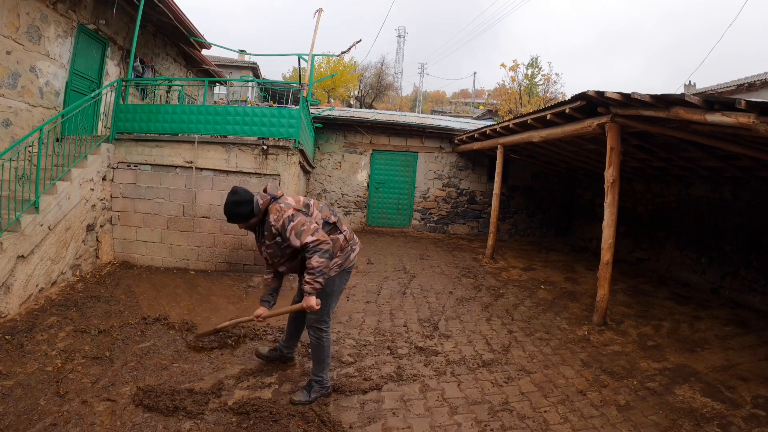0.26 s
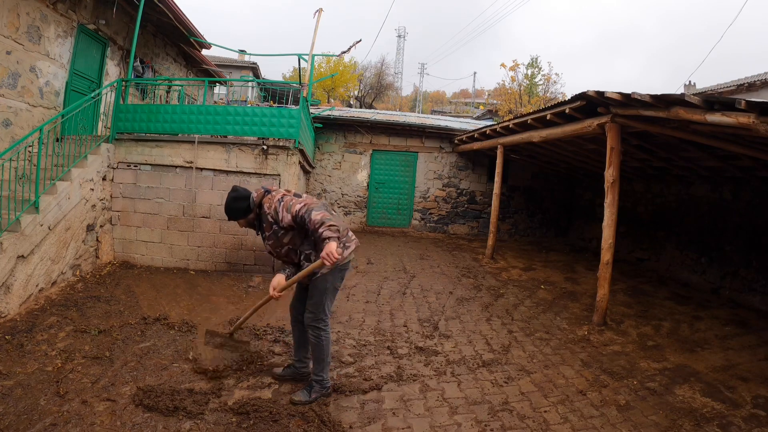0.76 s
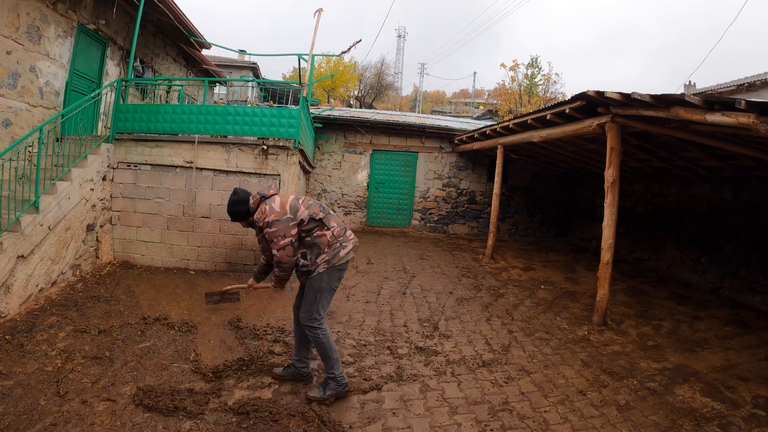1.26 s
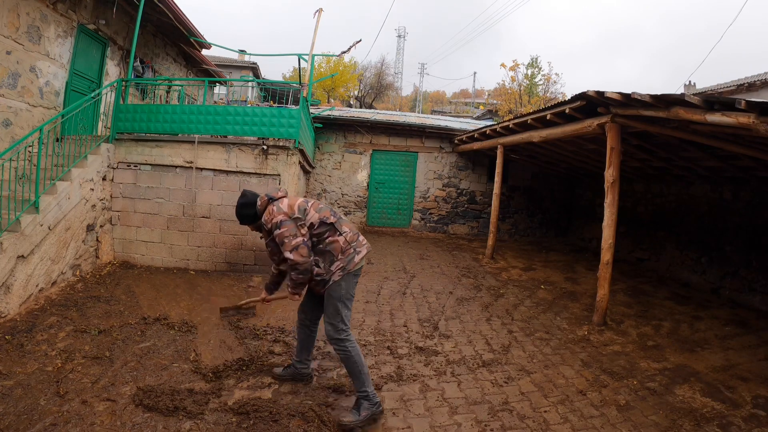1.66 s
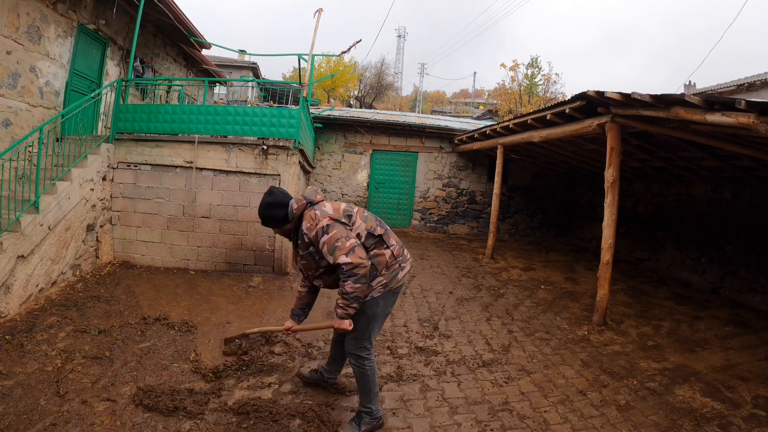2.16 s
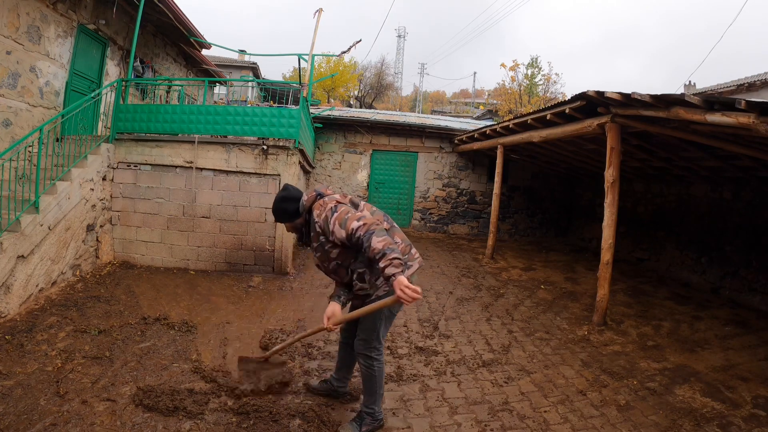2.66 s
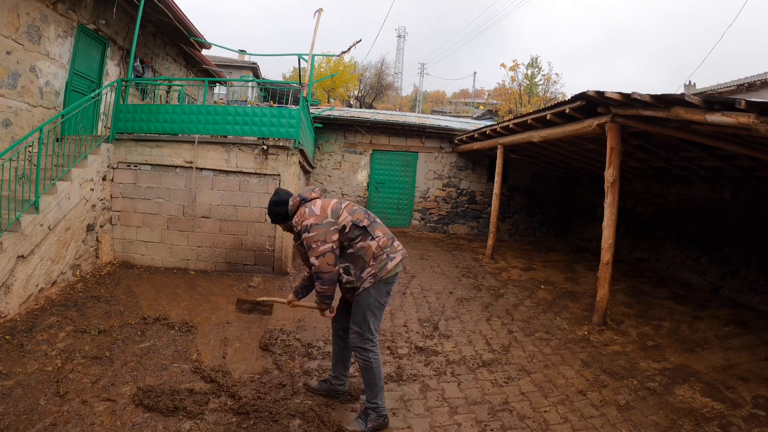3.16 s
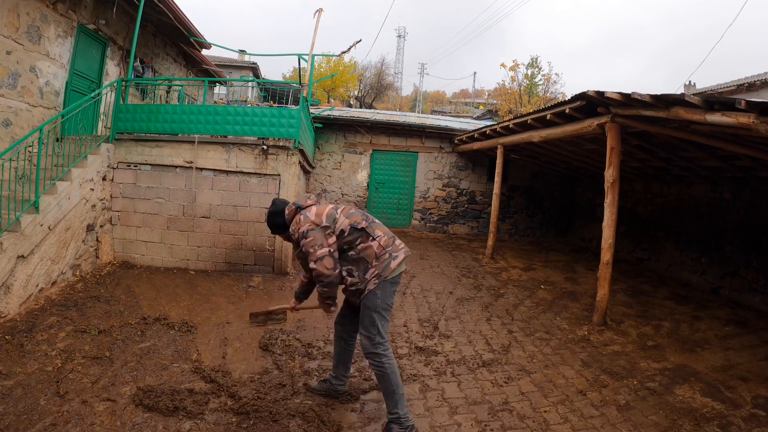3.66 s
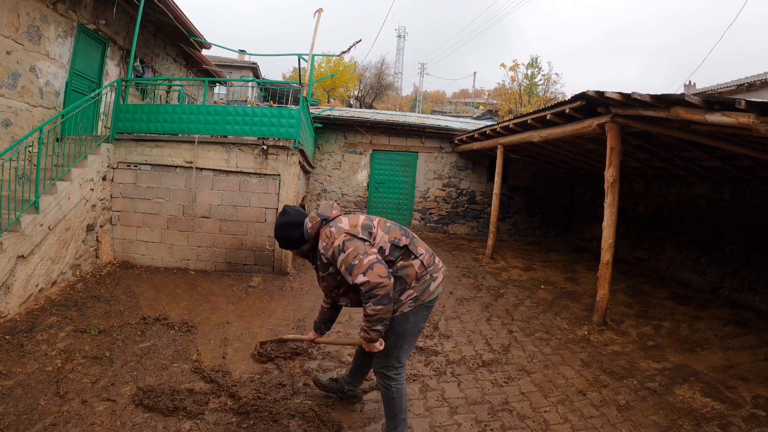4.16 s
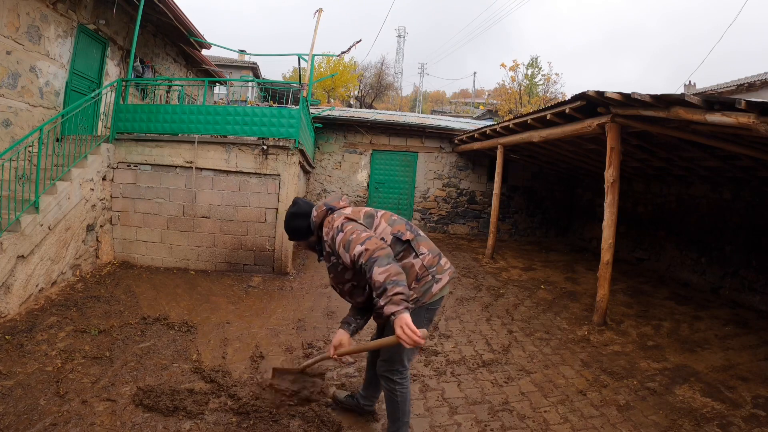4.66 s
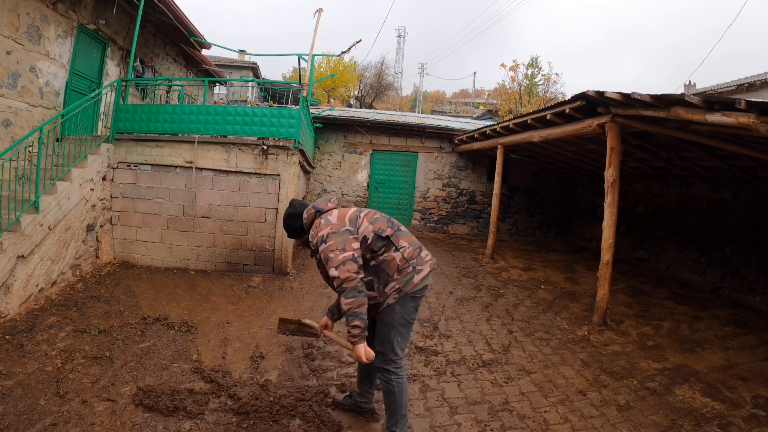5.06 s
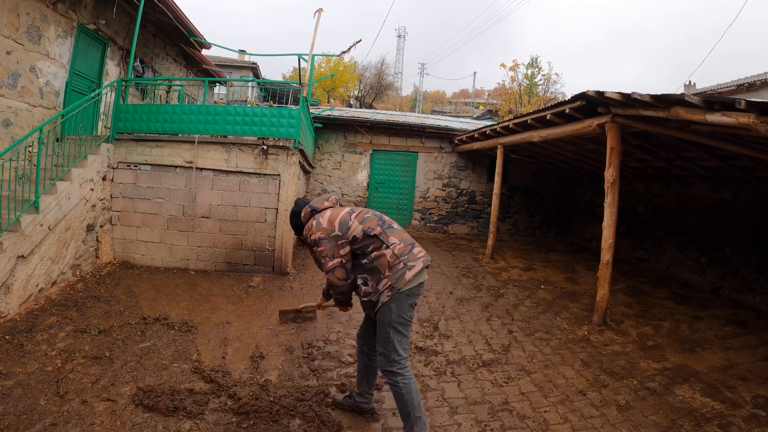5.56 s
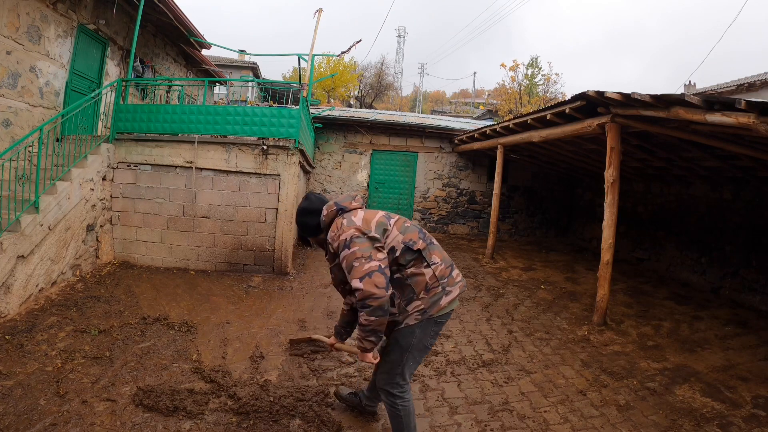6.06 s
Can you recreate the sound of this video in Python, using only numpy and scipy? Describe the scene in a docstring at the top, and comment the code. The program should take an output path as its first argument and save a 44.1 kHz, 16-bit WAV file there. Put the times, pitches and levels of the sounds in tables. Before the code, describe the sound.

A steel shovel pushes through wet mud on stone paving in a walled yard, a few metres away. Four gritty, rasping strokes come one after another, each full of sharp clacks and dull thuds as the edge catches on joints and the blade briefly rings. In the pauses mud drops off in small wet spatters, a jacket swishes and boots shift softly. The outdoor air behind is faint.

```python
"""Shovelling mud off stone

A steel shovel is pushed through wet mud over paving in a walled yard, a few metres away.
The edge rasps on grit and knocks on the joints between stones, ringing the blade and shaking the ground.
Between strokes mud drops off, a jacket swishes and boots shift, over faint outdoor air.
The walls answer, and the loudest knocks overload."""
import sys
import numpy as np
from scipy import signal
from scipy.fft import rfft, irfft, next_fast_len
from scipy.io import wavfile
from scipy.ndimage import uniform_filter1d, map_coordinates

SR = 44100
rng = np.random.default_rng(int(sys.argv[2]) if len(sys.argv) > 2 else 0)


def wav_out(sig):
    """Save sig, one row per channel (or a flat mono array), as 16-bit PCM at SR to the path in sys.argv[1]."""
    wavfile.write(sys.argv[1], SR, np.round(np.clip(np.atleast_2d(sig).T, -1, 1) * 32767).astype(np.int16))


N = 277830

# Tone colours: freq_hz, level_db
AIR_EQ = [(20, -95), (45, -87), (70, -113.5), (110, -100), (250, -79), (600, -101), (1300, -91.5),
          (4000, -92.5), (16000, -98)]
SLEEVE_EQ = [(300, -33), (1200, 3), (3000, 0), (5500, -1), (7000, -5), (16000, -5.5)]
BOOT_EQ = [(40, -33.5), (110, -11), (250, 3.5), (600, -10.5), (1200, -4), (2500, -14.5), (8000, -58)]
GROUND_EQ = [(12, -42.5), (22, -19.5), (50, -9.5), (80, 0), (115, -6), (200, -14.5), (700, -64)]
RUMBLE_EQ = [(40, -50.5), (90, -25), (130, -5.5), (170, 2), (330, -9), (600, -13), (2000, -100.5)]
GRIT_EQ = [(500, -31), (1800, 10), (3000, 1.5), (4500, -4.5), (7000, -11.5), (16000, -29.5)]
RASP_EQ = [(60, -79.5), (250, -14.5), (500, 3), (1000, 7), (1600, 0), (2500, -13.5), (5000, -45.5),
           (16000, -28.5)]
REVERB_EQ = [(45, -16), (100, -3), (1000, -2.5), (4000, -1.5), (10000, 1.5)]
MIC_EQ = [(20, -11), (6500, 1.5), (7500, -2), (8400, -12.5), (12500, -13), (14500, -32), (16000, -24)]
# Width of diffuse sound: freq_hz, left_right_correlation
STEREO_LIKENESS = [(60, 0.803), (500, 0.927), (2000, 0.365), (5000, 0.12), (10000, 0.15)]
# Stereo balance: freq_hz, left_over_right_db
BALANCE = [(60, 1), (180, -0.5), (520, 1), (1500, 3), (2600, 2.5), (4500, 1), (7500, 0.5), (12000, -2)]
# Decay of the yard: freq_hz, t60_s
WALL_DECAY = [(100, .24), (300, .36), (1000, .27), (3000, .24), (8000, .33)]
# Body movements: peak_s, level_db, rise_s, fall_s (both per 20 dB, sign ignored)
SLEEVE_MOVES = [(.72, -46, 0.091, 0.4), (.9, -55, .2, 1.07), (1.11, -55.5, 0.052, -1.5),
                (1.2, -47, 0.044, -0.64), (1.27, -42.5, 0.12, 0.21), (2.57, -39.5, 0.146, 0.1947),
                (2.67, -36, 0.03, -0.0076), (2.77, -44.5, 0.069, 0.02), (2.975, -47, .12, .15),
                (3.035, -48, .1, .07), (3.175, -50, .07, .3), (3.3, -43.5, 0.3, 0.3),
                (3.36, -45, 0.065, -0.08), (4.746, -35.5, 0.055, 0.0389), (5.31, -48, 0.037, -1.3),
                (5.39, -41, 0.28, -0.3)]
BOOT_MOVES = [(.72, -43.5, 0.057, 0.5953), (1.18, -46.5, 0.17, 0.3), (1.3, -46.5, 0.062, 2.4),
              (2.66, -40, 0.63, 0.14), (2.77, -54.5, 0.1009, 0.52), (3.04, -52, 0.057, 3.87),
              (3.19, -56.5, 0.033, 8.5), (3.3, -44, 0.16, 0.5), (4.7, -42.5, 0.37, 0.2042),
              (5.22, -56, 0.043, 0.23), (5.42, -43, 0.282, 0.4)]
# Falling mud and grit: start_s, level_db, pitch_hz, spatter_s
MUD_DROPS = [(.97, -36, 1290, 0.017), (1.079, -24.5, 1110, 0.0043), (1.112, -27.5, 1200, 0.011),
             (2.563, -6.5, 5860, 0.00345), (2.648, -15.5, 760, 0.01216), (2.665, -12, 1960, .013),
             (2.739, -18.5, 1141, 0.00874), (2.74, -28, 328.6, .005), (2.761, -17, 2875, 0.021),
             (2.769, -21, 806, 0.027), (2.81, -21, 6250, 0.0033), (2.968, -21.5, 3270, .02),
             (3.009, -24.5, 1150, 0.021), (3.022, -22.5, 1222, 0.0218), (3.034, -17, 2450, 0.0098),
             (3.047, -21.5, 1130, 0.014), (3.07, -24, 977, .025), (3.148, -32, 2500, .01),
             (3.178, -20, 1249, 0.0091), (3.18, -24.5, 329, 0.0049), (3.221, -24.5, 900, 0.011),
             (4.68, -27, 1086, 0.011), (4.729, -21.5, 898, 0.00951), (4.73, -11, 195.9, 0.00579),
             (4.746, -14, 1650, 0.011), (5.062, -35.5, 1110, 0.00536), (5.087, -29.5, 6140, .004),
             (5.216, -28, 1101, 0.00413), (5.265, -27.5, 295, 0.00522), (5.438, -12.5, 1210, 0.00423)]
# Heavy blows into the ground: start_s, peak_db
GROUND_JOLTS = [(0.001, -17.5), (0.091, -30.5), (0.226, -31.5), (0.341, -40), (0.61, -53), (1.431, -37.5),
                (1.689, -36), (1.752, -24), (2.049, -39.5), (2.309, -43), (3.349, -46.5), (3.649, -43),
                (3.73, -16), (3.838, -17), (4.209, -40), (4.475, -45.5), (5.517, -17.5), (5.709, -40.5),
                (5.819, -30), (5.943, -11), (5.981, -11), (6.064, -35.5), (6.162, -34.5)]
# Single grains splitting: start_s, level_db, pitch_hz
GRIT_TICKS = [(0.2543, -25.5, 3430), (2.0804, -17.5, 3190), (2.2985, -17, 3350), (2.3096, -8.5, 2973),
              (2.3333, -15, 2974), (2.3855, -12.5, 3108), (3.5765, -11, 2907), (3.5893, -19, 2770),
              (3.687, -11, 2850), (3.7337, -15.5, 2836), (3.7664, -22.5, 2674), (3.8503, -9, 2576),
              (4.0839, -25, 3120), (4.4753, -14.5, 2416), (5.8736, -20.5, 2820), (5.9477, -12, 2436),
              (6.0027, -12, 2440), (6.2592, -19.5, 2765)]
# Modes of the steel blade: pitch_hz, level_db, t60_s
BLADE_MODES = [(156, -6, 0.15), (169.9, 5.5, 0.24), (323.5, -22.5, 0.12), (335.1, -1, 0.386),
               (545, -1.5, 0.574), (632.2, -26, 0.092), (761.4, -4, 0.18), (933.7, -6, 0.31),
               (1022, -15.5, 0.26), (1243, -4, 0.13), (1390, -11, 0.098), (1540, -7, 0.13), (2172, -9, .1),
               (2855, -6, 0.068)]
# Scrape automation, one list per stroke: time_s, rasp_db, rasp_hz, grit_db
STROKE_CURVES = [
    [(0.0, -14, 650, -29), (0.1, -20.5, 877.5, -32.5), (0.18, -17, 909, -28), (0.225, -18, 630, -25.5),
     (0.27, -18, 738, -25.5), (0.305, -19, 729.6, -31), (0.336, -11.5, 861.7, -27),
     (0.385, -20.5, 1280, -26), (0.425, -19.5, 1400, -28.5), (0.465, -25, 1100, -30),
     (0.5, -34, 742, -29.5), (0.58, -36, 810, -40), (0.615, -25.5, 913.3, -38.5), (0.66, -35.5, 888, -38.5),
     (0.72, -53, 831, -44.5)],
    [(1.44, -26.5, 800, -26), (1.5, -25.5, 597.7, -33.5), (1.58, -26.5, 775, -37), (1.668, -16, 717, -28),
     (1.92, -19, 841.5, -32.5), (1.99, -13.5, 806.3, -20.5), (2.056, -29, 766, -36.5),
     (2.1, -19, 574.7, -30), (2.198, -19.5, 767, -30), (2.276, -18, 623.6, -31), (2.368, -15, 810, -35),
     (2.5, -40, 698.7, -41.5)],
    [(3.335, -28.5, 1100, -24), (3.365, -29, 1100, -25.5), (3.44, -30.5, 908, -46), (3.52, -24, 852, -36),
     (3.636, -19.5, 825, -31.5), (3.7, -18, 899.6, -32), (3.76, -25, 911, -44), (3.8, -14.5, 790.2, -21.5),
     (3.86, -15.5, 870, -29), (3.98, -29.5, 982.5, -47), (4.05, -20, 756.7, -39), (4.118, -22, 939, -26.5),
     (4.206, -17.5, 769, -34.5), (4.27, -14.5, 695.7, -32), (4.344, -23.5, 1087, -34),
     (4.465, -39.5, 1048, -44), (4.498, -20.5, 1250, -46), (4.57, -29.5, 901.5, -37.5),
     (4.624, -48.5, 951.3, -42), (4.7, -50.5, 1096, -45)],
    [(5.515, -25, 1000, -26.5), (5.59, -30, 763.3, -45.5), (5.656, -23.5, 967, -35),
     (5.72, -24.5, 803, -36), (5.93, -21, 958.5, -31), (6.024, -16.5, 637.8, -31.5),
     (6.072, -25, 865, -30.5), (6.154, -49, 800.5, -40.5), (6.222, -19, 939.4, -43.5),
     (6.3, -26, 743.5, -34)],
]
# Edge meets stone: start_s, level_db, thud_db, crack_db, ring_db (these three relative), clack_hz
EDGE_KNOCKS = [(0.002, -15.5, 10.5, -14.5, -23.5, 700.6), (0.064, -2, -5.5, -21.5, -14.5, 765),
               (0.09, -0.5, -4.5, -11, -23, 862.7), (0.191, -12.5, -28, -14.5, -22.5, 770),
               (0.225, -8.5, 9.5, -6, -2.5, 609.6), (0.256, -12.5, -17, -15, -20.5, 1041),
               (0.284, -8.5, -26.5, -16.5, -13, 1130), (0.298, 0.5, -5.5, -25.5, -23, 692),
               (0.339, -7.5, -17, -18, -12, 1070), (0.379, -5.5, -25, -18, -32.5, 1136),
               (0.485, -5.5, -10.5, -18, -14.5, 797), (0.538, -16.5, -20, -11, -34.5, 754),
               (0.598, -7, -1, -9.5, -18.5, 797), (0.615, -12.5, -2.5, -15.5, -27.5, 942),
               (0.667, -13, 0.5, -13.5, -27, 1030), (0.747, -29.5, -13, -1, -31.5, 1480),
               (0.815, -33.5, -26, 1, -28, 1460), (1.425, -6, -36, 2.5, -9.5, 1866),
               (1.432, 3.5, -25.5, -3, -14, 1544), (1.541, -7.5, -1, -17, -24.5, 471),
               (1.592, -9.5, -8.5, -11, -27, 1220), (1.61, -13, 2, -18, -27.5, 970),
               (1.651, -2.5, -1, -27, -19.5, 721), (1.676, -12, -10.5, -21.5, -21.5, 802),
               (1.689, -0.5, -3.5, -21, -11.5, 754), (1.753, -5, 2.5, -20, -33.5, 569.8),
               (1.79, -9.5, -9, -20, -5, 1275), (1.801, -9.5, -6.5, -16, -20, 1116),
               (1.812, -10.5, -11.5, -17, -20.5, 701), (1.839, -2, -1, -19.5, -25, 926),
               (1.94, -5.5, 1, -8.5, -12.5, 1202), (2.011, -5, -3.5, -13.5, -8.5, 834),
               (2.086, -19, -7, -12.5, -23, 622), (2.184, -9, -13.5, -8, -3, 1320),
               (2.217, 1, -6, -20.5, -34, 703), (2.31, 3.5, -1.5, -12, -25, 370),
               (2.321, -2.5, -16, -17, -25.5, 997), (3.321, -6.5, -10.5, 3.5, -14, 829),
               (3.348, -2, -6.5, 0.5, -19, 893), (3.364, -4.5, -5.5, -5.5, -21.5, 808),
               (3.499, -16, -21, -8, -6, 710), (3.564, -13.5, -12.5, -15, -22, 900),
               (3.613, -16, -13, -16, -20.5, 1013), (3.632, -10.5, -12.5, -21, -17, 834),
               (3.65, -5, 2.5, -5.5, -23.5, 789), (3.718, -4.5, -4.5, -10.5, -16.5, 925.8),
               (3.733, 1, -1, -15, -14.5, 994), (3.785, -5.5, 3, -15, -12.5, 492.6),
               (3.83, -9, -10, -17, -20.5, 1108), (3.84, 2.5, -5, -17, -12, 854),
               (3.864, -1, -23, -21.5, -34.5, 1036), (3.896, -6.5, -15, -21.5, -26, 840),
               (3.964, -24, -3.5, 5, -8, 938), (3.997, -3.5, -16.5, -19, -17.5, 1018),
               (4.011, -10, -1.5, -13.5, -5.5, 1590), (4.119, -13.5, -17, -1.5, -10, 1007),
               (4.163, -16.5, -3.5, -19.5, -22, 770), (4.208, -10, -6.5, -26, -10.5, 709),
               (4.227, -11, 3, -8, -28, 929), (4.259, -11.5, -11, -26, -29, 586),
               (4.396, -11.5, -3, -4, -17, 1360), (4.476, 0, -14, -10, -19.5, 1638),
               (4.489, -17, -7, -22.5, -29, 1110), (4.495, -17.5, -12.5, -19.5, -29.5, 1480),
               (4.504, -8, -10, -27.5, -26, 1240), (4.514, -15, -7, -29, -34.5, 1150),
               (4.58, -20, -14.5, -11, -32.5, 760.2), (5.498, -3, -3, -1.5, -53.5, 1513),
               (5.52, -5.5, -12.5, -8, -9.5, 2373), (5.652, -16, -1, -18, -19.5, 934),
               (5.676, -1, -9, -7.5, -8.5, 884.7), (5.708, -1.5, -5, -21.5, -7.5, 436.5),
               (5.745, -5.5, -6.5, -6, -8, 993), (5.765, -8, 4, -12.5, -21.5, 1170),
               (5.821, -12.5, 2.5, -1, -16.5, 385), (5.853, -9.5, -18, -10.5, -13.5, 1170),
               (5.879, -8.5, -10, -19, -9.5, 990.6), (5.889, -5, -5, -19, -14, 1039),
               (5.946, -1, 1.5, -10.5, -16, 884.5), (5.962, -6, 1, -17.5, -15.5, 1218),
               (5.985, -2.5, 6.5, -7.5, -11, 931.5), (6.056, -6.5, -26, -7, -3, 1010),
               (6.065, -0.5, -19, -11, -12, 1350), (6.089, -0.5, -5.5, -15.5, -5, 833),
               (6.097, -10, -5, -22, -12, 590.2), (6.119, -5, -2, -18, -16.5, 479),
               (6.171, 1.5, -2.5, -10, -12.5, 1037)]
# Knocks that land where one mode swings freely: start_s, mode_hz, boost_db
FREE_MODES = [(1.425, 2172, 10), (1.432, 2172, 6), (1.432, 547, 1), (1.689, 1022, 4), (3.348, 333, 4),
              (5.676, 929, 4), (5.984, 547, 1)]
# The emptied blade comes down: time_s
BLADE_LANDINGS = [1.425, 3.321, 5.498]

EMPTY_RING, MUDDY_RING = 0.7, 0.17  # share of the ring time left on the blade
FILL_S, WAVER_HZ = 0.05, 8.94  # how fast the blade fills; how far shifting mud blurs its pitches
GRIT_HZ, WANDER_OCTAVES, GRIT_FOLLOW = 3126, 0.076, 0.32  # grit pitch, its drift, its tracking of the rasp
RUMBLE_DB, BOOM_DB = -8.5, -37  # handle and ground under the rasp
BOOM_FADE_DB_PER_S = -0.5
SQUEAK_DB, SQUEAL_DB = -14, -13  # stones that stick and sing, under grit and under rasp
CHATTER_DB, BITE_S, CHATTER_T60_S = -15, .003, .1  # the bite rises 20 dB in BITE_S
TOP_HZ = 15800


def amp(db):
    """Decibels to gain."""
    return 10 ** (np.asarray(db) / 20)


def unit(x):
    """Scale to an RMS of 1."""
    return x / np.sqrt(np.mean(x ** 2) + 1e-20)


def along(points, hz):
    """Read a curve on a log frequency axis."""
    freqs, values = np.transpose(points)
    return np.interp(np.log(hz + 1), np.log(freqs + 1), values)


def wobble(rate):
    """A smooth random curve, rate knots a second."""
    knots = rng.standard_normal(int(N * rate / SR) + 4)
    return map_coordinates(knots, [np.arange(N) * rate / SR])


def filtered(x, response):
    """Apply a frequency response."""
    size = next_fast_len(N + SR // 2)
    return irfft(rfft(x, size) * response(np.fft.rfftfreq(size, 1 / SR)), size)[..., :N]


def equalise(x, colour):
    """Zero-phase EQ."""
    return filtered(x, lambda hz: amp(along(colour, hz)))


def impulse(colour, size=4096):
    """A minimum-phase pulse of energy 1 with this colour."""
    cepstrum = irfft(np.log(amp(along(colour, np.fft.rfftfreq(size, 1 / SR)))))
    cepstrum[1:size // 2] *= 2
    cepstrum[size // 2 + 1:] = 0
    pulse = irfft(np.exp(rfft(cepstrum)))[:size // 2]
    return pulse / np.linalg.norm(pulse)


def excite(drive, colour):
    """Play a signal through a body of this colour."""
    return signal.fftconvolve(drive, impulse(colour))[:N]


def ping(t, hz, cycles):
    """A tone that dies by 60 dB in this many cycles."""
    return np.sin(2 * np.pi * hz * t) * amp(-60 * t * hz / cycles)


def spread(pair):
    """Stereo from two unrelated sounds, narrow in the bass."""
    def mid_side(hz):
        angle = np.arccos(np.clip(along(STEREO_LIKENESS, hz), -1, 1)) / 2
        return np.array([np.cos(angle), np.sin(angle)])
    mid, side = filtered(np.array(pair), mid_side)
    return np.array([mid + side, mid - side])


def grains(rate, spiky_db, smooth):
    """Random contacts of unequal size over a steady rub."""
    hit, size, sign = rng.random((3, N))
    contacts = (hit < rate / SR) * amp(-spiky_db * np.log(np.maximum(size, 1 / 40))) * (sign - .5)
    return unit(unit(contacts) + smooth * rng.standard_normal(N))


def outdoor_air():
    """A faint, steady bed of air."""
    return spread(equalise(rng.standard_normal((2, N)), AIR_EQ) * np.sqrt(SR / 2))


def yard_walls(x, step_s=.45, predelay_samples=330):
    """Each band dies at its own speed; the blade moves, so fresh tails keep fading in."""
    step = int(step_s * SR)
    out, fade = np.zeros((2, N + 2 * SR)), np.hanning(2 * step)
    padded = np.pad(x, (step, 2 * step))
    for start in range(0, N + step, step):
        hz, t, bands = signal.stft(rng.standard_normal((2, SR * 2 // 3)), SR, nperseg=256)
        tail = signal.istft(bands * amp(-60 * t / along(WALL_DECAY, hz)[:, None]), SR, nperseg=256)[1]
        piece = padded[start:start + 2 * step] * fade
        wet = signal.fftconvolve(piece[None], tail / np.linalg.norm(tail[0]), axes=1)
        out[:, start:start + wet.shape[1]] += wet
    return equalise(spread(out[:, step - predelay_samples:][:, :N]), REVERB_EQ)


def body_rub(moves, colour, flutter_db, flutter_hz, rate, smooth):
    """A sleeve or boot rubs: grainy noise that swells with each move."""
    t = np.arange(N) / SR
    swells = sum(amp(db - 20 * np.maximum((s - t) / abs(rise), (t - s) / abs(fall)))
                 for s, db, rise, fall in moves)
    flutter = amp(flutter_db * wobble(flutter_hz))
    friction = [unit(equalise(grains(rate, 0, smooth), colour)) for _ in range(2)]
    return swells * flutter * spread(friction)


def mud_drops():
    """Each drop is a click of a few cycles, then smaller droplets of scattered pitch."""
    out, t = np.zeros(N + SR), np.arange(SR // 30) / SR
    for s, db, hz, spatter_s in MUD_DROPS:
        for k, (late, bend, softer) in enumerate(rng.random((8, 3))):
            droplet = k > 0
            pitch_hz = min(hz * 2 ** (droplet * 2.236 * (bend - .35)), SR / 3)
            click = ping(t, pitch_hz, cycles=8) * np.minimum(t * pitch_hz, 1)
            start = round((s + droplet * late * spatter_s) * SR)
            out[start:][:len(t)] += amp(db - droplet * (6.5 + 10 * softer)) * click
    return out[:N]


def ground_jolts(late_s=0.0046):
    """The ground booms under heavy knocks."""
    s, db = np.transpose(GROUND_JOLTS)
    blows = np.bincount(((s + late_s) * SR).astype(int), amp(db), N)
    boom = impulse(GROUND_EQ)
    return signal.fftconvolve(blows, boom / np.abs(boom).max())[:N]


def grit_ticks():
    """A grain splits with a click and three short pitches."""
    out, t = np.zeros(N + SR), np.arange(SR // 40) / SR
    for s, db, hz in GRIT_TICKS:
        pitch_hz = hz * np.array([[1], [1.12], [1.6]]) * 2 ** (0.033 * rng.standard_normal((3, 1)))
        tones = (amp([[0], [-5], [-7]]) * ping(t, pitch_hz, cycles=55)).sum(0)
        click = .5 * amp(-60 * t / 0.0023) * rng.standard_normal(len(t))
        out[round(s * SR):][:len(t)] += amp(db - 5.5) * (tones * np.minimum(t / .0008, 1) + click)
    return out[:N]


def edge_chatter():
    """The edge bites in at each knock, then judders over the stone."""
    s, db = np.transpose(EDGE_KNOCKS)[:2]
    lead = SR // 50
    t = (np.arange(SR // 5) - lead) / SR - .002
    shape = amp(np.minimum(20 * t / BITE_S, -60 * t / CHATTER_T60_S))
    energy = np.bincount((s * SR).astype(int), amp(db + CHATTER_DB) ** 2, N)
    envelope = np.sqrt(np.abs(signal.fftconvolve(energy, shape ** 2)[lead:][:N]))
    judder = amp(4.3 * wobble(120)) * grains(400, spiky_db=2, smooth=0.968)
    return excite(envelope * unit(judder), RASP_EQ)


def wandering_contact(x, depth_db):
    """Resonances come and go as the contact wanders along the edge."""
    bands = signal.stft(x, nperseg=256)[2]
    ripple = uniform_filter1d(rng.standard_normal(bands.shape), size=3, axis=0)
    ripple = uniform_filter1d(ripple, size=12, axis=1)
    return unit(signal.istft(bands * amp(depth_db * unit(ripple)), nperseg=256)[1][:N])


def crunch(db, centre_hz, rate, cycles, octaves, spiky_db, samples=320):
    """Stones crack under the edge: bunches of pings scattered round a moving pitch."""
    active, t = db > -70, np.arange(samples) / SR
    starts = np.flatnonzero(rng.random(N) < rate / SR * amp(5 * wobble(40)) * active)
    bend, size = rng.standard_normal(len(starts)), rng.exponential(size=len(starts))
    hz = (centre_hz[starts] * 2 ** (octaves * bend))[:, None]
    pings = ping(t, hz, cycles) * np.minimum(t * hz, 1)
    pings *= amp(spiky_db * np.minimum(size, 2.5))[:, None] * np.sqrt(hz)
    slots = starts[:, None] + np.arange(samples)
    cracks = np.bincount(slots.ravel(), pings.ravel(), N + samples)[:N]
    return amp(db) * cracks / np.sqrt(np.mean(cracks[active] ** 2))


def stroke_automation():
    """Rasp level, rasp pitch and grit level, faded out between strokes."""
    rest = [-90, 900, -90]
    strokes = [[[rows[0][0] - .01, *rest], *rows, [rows[-1][0] + .03, *rest]] for rows in STROKE_CURVES]
    s, *columns = np.concatenate(strokes).T
    return [np.interp(np.arange(N) / SR, s, column) for column in columns]


def shovel_scrape():
    """Grit catches under the edge in bunches; the same contacts shake blade, handle and ground."""
    rasp_db, rasp_hz, grit_db = stroke_automation()
    grit_hz = GRIT_HZ * 2 ** (WANDER_OCTAVES * wobble(14)) * (rasp_hz / 850) ** GRIT_FOLLOW
    catch = amp(3.2 * wobble(35) + 0.44 * wobble(15))
    stones = catch * wandering_contact(grains(500, spiky_db=2, smooth=0.82), depth_db=2.5)
    sand = catch ** 0.799 * wandering_contact(grains(1500, spiky_db=1.5, smooth=0.9), depth_db=4)
    drive = amp(rasp_db) * stones
    rub = excite(amp(-10.5) * drive, RASP_EQ) + excite(amp(grit_db - 1) * sand, GRIT_EQ)
    t = np.arange(SR // 4) / SR
    muddy_ring = sum(amp(db - 60 * t / (0.22 * t60)) * np.sin(2 * np.pi * hz * t)
                     for hz, db, t60 in BLADE_MODES)
    blade = signal.fftconvolve(amp(-21) * drive, muddy_ring / np.linalg.norm(muddy_ring))[:N]
    coarse = crunch(rasp_db, rasp_hz, rate=450, cycles=6, octaves=0.412, spiky_db=2)
    fine = crunch(grit_db, grit_hz, rate=700, cycles=13, octaves=0.207, spiky_db=3.5)
    squeak = crunch(grit_db, grit_hz, rate=25, cycles=45, octaves=.3, spiky_db=3, samples=1200)
    squeal = crunch(rasp_db, rasp_hz, rate=30, cycles=28, octaves=.5, spiky_db=3, samples=2000)
    cracks = amp(-2) * coarse + amp(-12.5) * fine + amp(SQUEAK_DB) * squeak + amp(SQUEAL_DB) * squeal
    handle = amp(RUMBLE_DB) * excite(drive, RUMBLE_EQ)
    ground = amp(BOOM_DB + BOOM_FADE_DB_PER_S * np.arange(N) / SR) * excite(drive, GROUND_EQ)
    return rub + cracks + blade + handle + ground


def blade_ring(s, t):
    """The steel rings from a knock at time s; gathering mud damps, detunes and blurs its modes."""
    hz, level_db, t60 = np.transpose(BLADE_MODES)[:, :, None]
    since_s = min(abs(s - landed) if s > landed - .01 else 1 for landed in BLADE_LANDINGS)
    load = 1 - np.exp(-since_s / FILL_S)
    boost_db = sum(db * (abs(s - at) < .004) * (abs(hz / mode_hz - 1) < .06)
                   for at, mode_hz, db in FREE_MODES)
    free = np.where(boost_db > 0, EMPTY_RING, EMPTY_RING + (MUDDY_RING - EMPTY_RING) * load)
    strengths = amp(level_db + boost_db + rng.normal(0, 3.1 + 3 * load, hz.shape))
    detuned_hz = hz * (1 + 0.0474 * (1 - free) * rng.standard_normal(hz.shape))
    phase_step = np.sqrt(2 * np.pi * WAVER_HZ * (.1 + load) / 100)  # a random walk, 100 steps a second
    walks = phase_step * np.cumsum(rng.standard_normal((len(hz), 26)), axis=1)
    waver = np.array([np.interp(t * 100, np.arange(26), walk) for walk in walks])
    modes = strengths * amp(-60 * t / (t60 * free)) * np.sin(2 * np.pi * detuned_hz * t + waver)
    return modes.sum(0) * (1 - np.exp(-t / 0.0016))


def shovel_knocks():
    """The edge hits a joint: a clack, a crack of grit, a thud just after, and the blade ringing."""
    out, t = np.zeros(N + SR), np.arange(SR // 6) / SR
    hit_t = t[:SR // 20]
    rasp, grit, rumble = impulse(RASP_EQ), impulse(GRIT_EQ), impulse(RUMBLE_EQ)
    press = 1 - np.exp(-(hit_t / 0.00165) ** 3)  # the edge presses in before it slips
    blow = signal.unit_impulse(len(hit_t), idx=80)

    def normalised(x):
        return x[:len(hit_t)] / np.abs(x).max()

    def burst(body, t60_s, loose):
        slip = loose * press * amp(-60 * hit_t / t60_s) * rng.standard_normal(len(hit_t))
        return signal.fftconvolve(blow + slip, body)

    for s, db, thud_db, crack_db, ring_db, clack_hz in EDGE_KNOCKS:
        pitch_hz = clack_hz * 2 ** (0.04 * rng.standard_normal())
        tone = ping(np.maximum(hit_t - .0017, 0), pitch_hz, cycles=9)
        clack = normalised(burst(rasp, t60_s=0.0194, loose=0.212)) + 0.924 * normalised(tone)
        crack = amp(crack_db) * normalised(burst(grit, t60_s=0.0164, loose=0.531))
        thud = -amp(thud_db) * normalised(np.pad(burst(rumble, t60_s=0.0069, loose=0.065), (50, 0)))
        start = round(s * SR)
        out[start:][:len(hit_t)] += amp(db) * (clack + crack + thud)
        out[start + 60:][:len(t)] += amp(db + ring_db) * blade_ring(s, t)
    return out[:N]


def scene():
    """Shovel, mud, walls and worker sit slightly left, over the bed of air."""
    def low_cut(hz):  # keeps knocks, chatter, ticks and mud drops light, with no deep bass
        return (1j * hz / (90 + 1j * hz)) ** 2

    def pan(hz, left_lag_s=1.5e-5):
        side = np.array([[.5], [-.5]])
        return amp(along(BALANCE, hz) * side) * np.exp(-2j * np.pi * hz * left_lag_s * side)

    shovel = shovel_scrape() + ground_jolts()
    shovel += filtered(shovel_knocks() + edge_chatter() + grit_ticks(), low_cut)
    mud = filtered(mud_drops(), low_cut)
    reverb = yard_walls(shovel + amp(-5) * mud)
    sleeves = body_rub(SLEEVE_MOVES, SLEEVE_EQ, flutter_db=1.4, flutter_hz=25.11, rate=3000, smooth=1)
    boots = body_rub(BOOT_MOVES, BOOT_EQ, flutter_db=1.7, flutter_hz=21.993, rate=300, smooth=1.6)
    return filtered(shovel + mud + reverb + sleeves + boots, pan) + outdoor_air()


def record(dry):
    """The microphone dulls the top, the loudest peaks clip, and everything above TOP_HZ is cut."""
    dull = equalise(dry, MIC_EQ)
    clipped = dull / (1 + np.abs(dull) ** 8) ** (1 / 8)
    return np.clip(filtered(clipped, lambda hz: hz < TOP_HZ), -1, 1)


dry = scene()
out = record(dry)
wav_out(out)
```